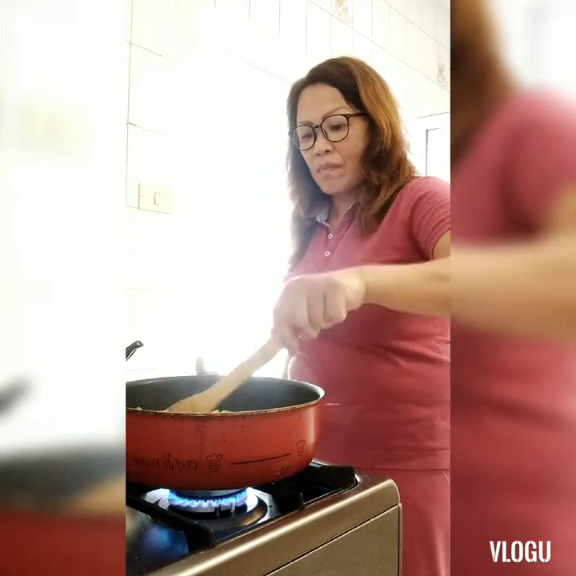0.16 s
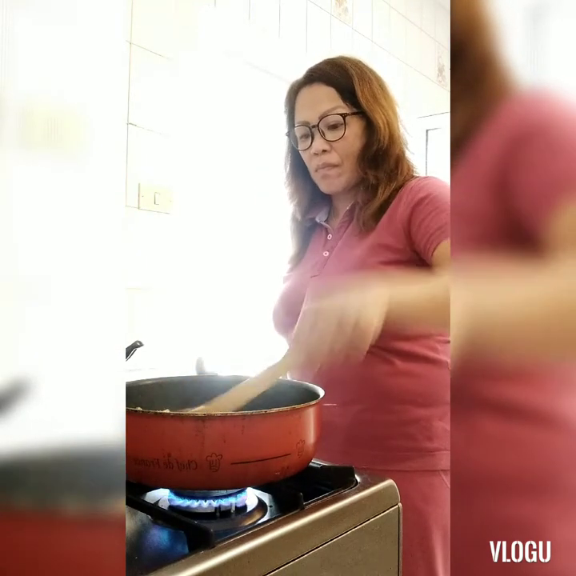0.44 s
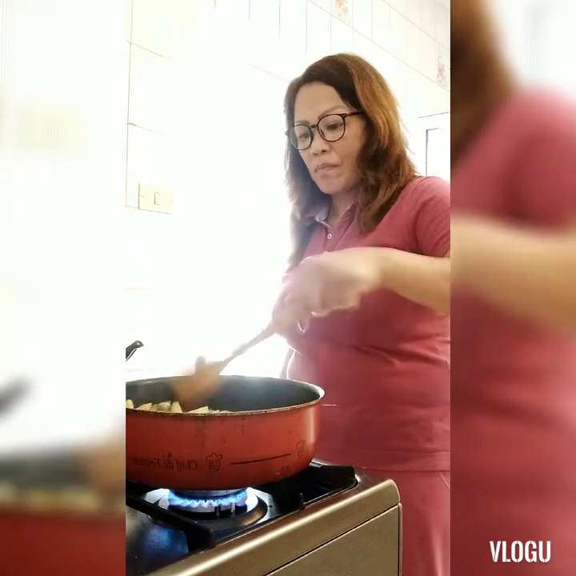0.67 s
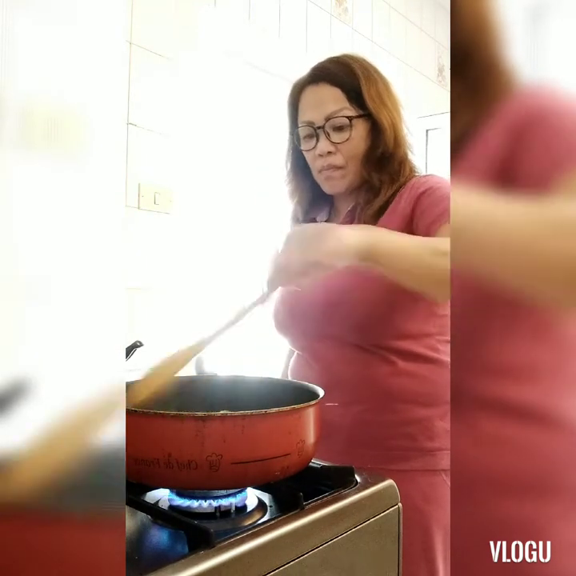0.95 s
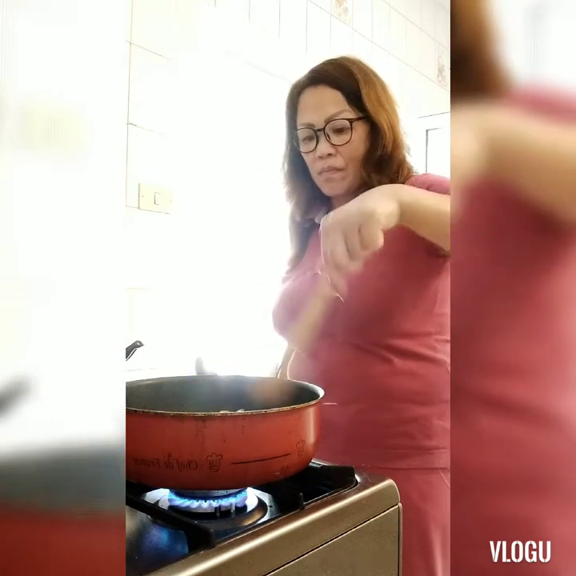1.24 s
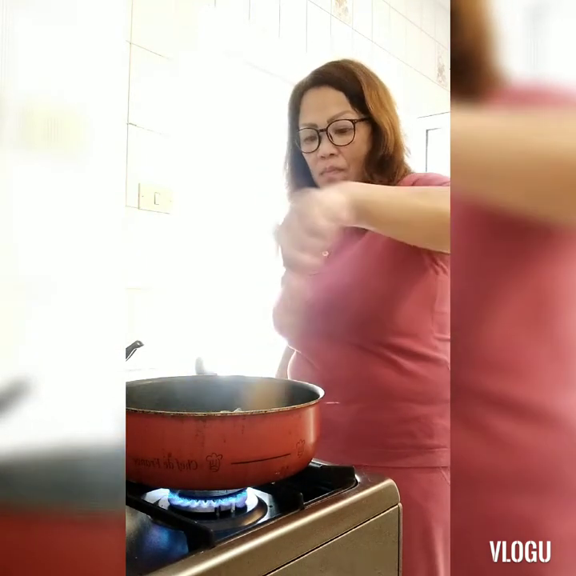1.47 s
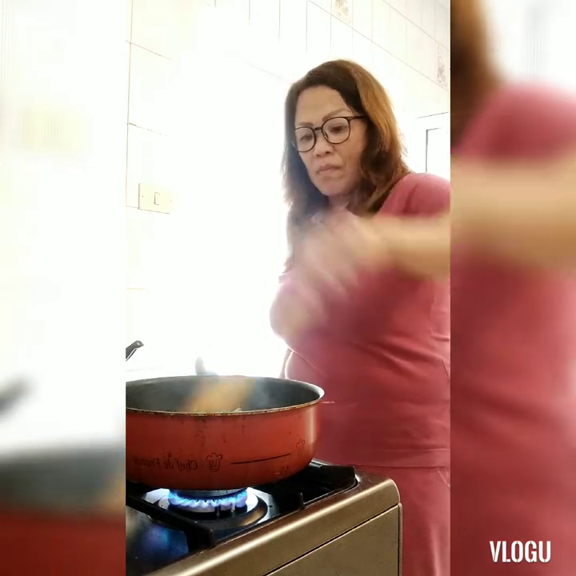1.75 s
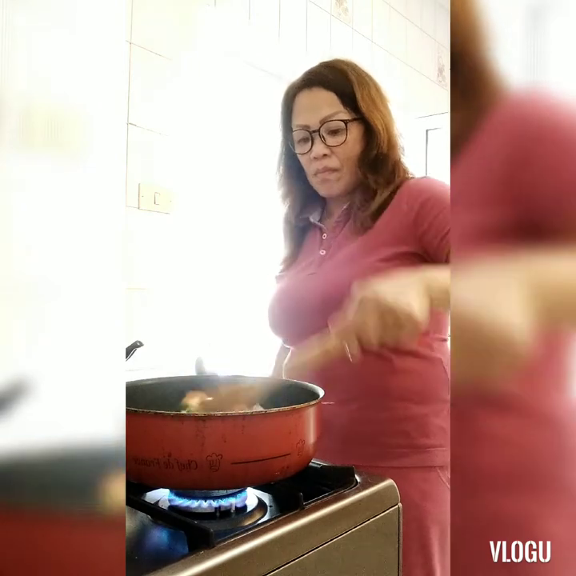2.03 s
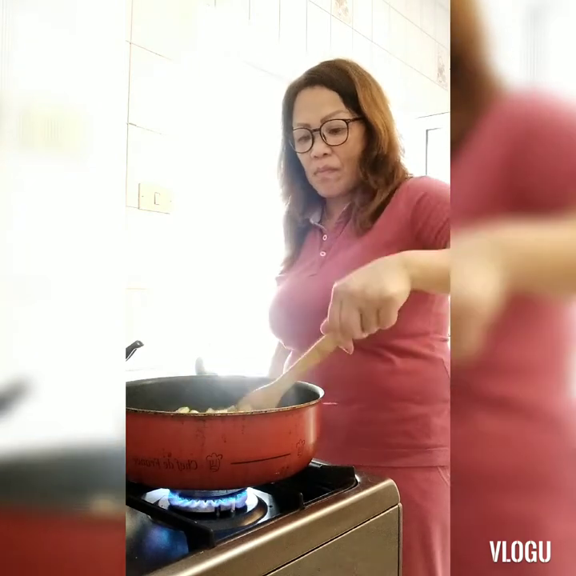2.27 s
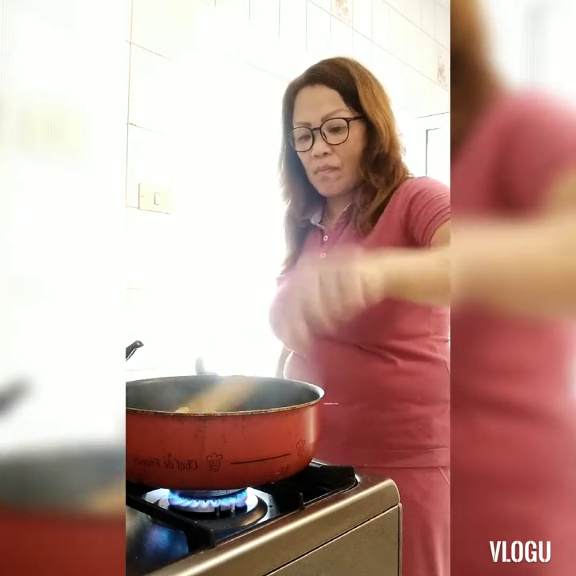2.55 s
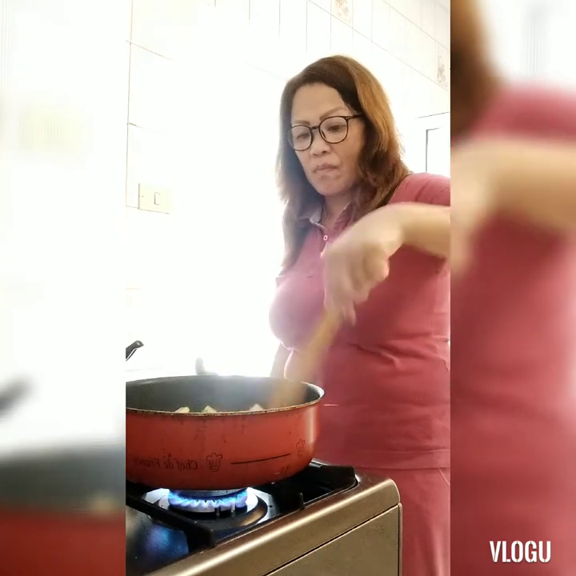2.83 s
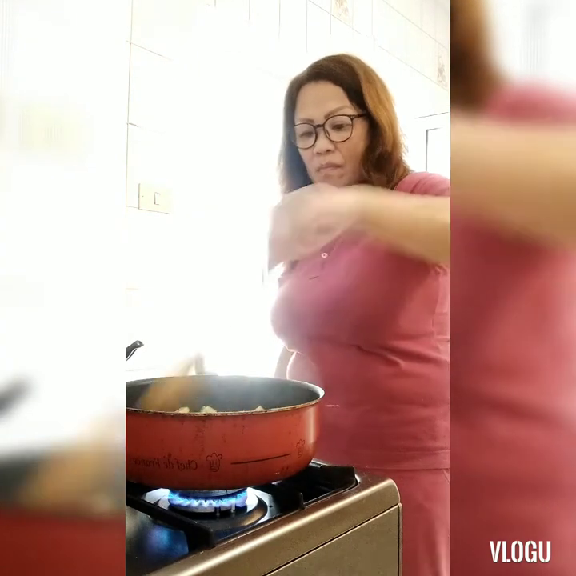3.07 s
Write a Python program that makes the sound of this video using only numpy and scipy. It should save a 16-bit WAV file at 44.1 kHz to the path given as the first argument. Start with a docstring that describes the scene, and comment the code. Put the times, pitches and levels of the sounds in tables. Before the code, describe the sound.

Wooden spatula knocking unevenly against a metal pan, with light scraping, frying hiss and low hum

```python
"""A soft scrape over frying hiss, then a wooden spatula knocks hard in a frying pan on a gas stove, close by.
Knocks: impulses and grainy chatter through the pan's modes, a low thud, a small kitchen's reverberation.
Scraping among the vegetables: grainy noise through the pan. Oil spits: bursts of treble noise.
Underneath: shaped noise for flame and frying, and a wavering low hum with rumble and two overtones."""
import sys
import numpy as np
from scipy import signal
from scipy.fft import rfft, irfft, next_fast_len
from scipy.io import wavfile
from scipy.ndimage import uniform_filter1d

SR = 44100
rng = np.random.default_rng(int(sys.argv[2]) if len(sys.argv) > 2 else 0)


def pcm_store(signal):
    """Save signal as 16-bit PCM."""
    levels = np.round(np.clip(np.atleast_2d(signal), -1, 1) * 32767)
    wavfile.write(sys.argv[1], SR, levels.astype(np.int16).T)


N = 141120

# pan modes: freq_hz, level_db, t60_s, home (-1 base, 1 wall)
PAN_MODES = [(365, 3.5, 0.58, -0.59), (463, 5, 0.18, -1.2), (572, -1.5, 0.049, -1), (646, 2, 0.075, -0.63),
             (739, 4, 0.051, 0.71), (820, 5.5, 0.023, -1.6), (1093.5, 2, 0.048, 0.85),
             (1301, 2, 0.031, 0.15), (1533, 0, 0.047, 0.64), (1876, 6, 0.029, -0.24), (2194, 6.5, 0.023, 1),
             (2464, 8, 0.027, 1), (2630, -6, 0.25, 0.23), (3270, -11, 0.063, 0.82), (4100, -3, 0.081, 0)]
# broad zones of pan and spatula above the base note (wall, rim, edge, tick): centre_hz, width_hz
PAN_ZONES = [(1100, 834), (1750, 1190), (2780, 1010), (3900, 3830)]
# knocks: start_s, crack_db, base_hz, blow_db, chatter_db, chatter_rise_s, chatter_lasts_s, thud_db,
# base_db, wall_db, rim_db, edge_db, tick_db
KNOCKS = [(0.1529, -10.5, 730, -7, -14.5, 0.0011, 0.087, -28, 3, 6, -3, -15.5, -52),
          (0.304, -14, 790, -33.5, -26, 0.0026, 0.038, -45.5, 16.5, 17, -13, -16, -52),
          (0.361, -16.5, 735, -21, -29, 0.0046, 0.031, -47.5, 7, 6, -27, -23, -42),
          (0.585, -17, 700, -11, -21.5, 0.00085, 0.069, -33, -10.5, -1, -6, -1, -9.5),
          (0.753, -32, 800, -39, -39.5, 0.0052, 0.087, -49, 12.5, 11.5, -25, -30, -44),
          (1.208, -47, 833, -34, -19, 0.033, 0.023, -44, 2, -12, -21, -33, -34),
          (1.238, -6.5, 646, -11, -14, 0.0024, 0.15, -44, 8, 0.5, -18, -42, -67),
          (1.249, -30, 520, -47, -28, 0.02, 0.044, -45.5, -17, 17, 6, 1.5, -48),
          (1.505, -25, 718, -7.5, -17.5, 0.0021, 0.068, -35, -6.5, 0, -8.5, -6.5, -10.5),
          (1.647, -46, 563, -32, -48, 0.0038, 0.071, -56, 4.5, 5.5, -27, -22, -12),
          (1.756, -54, 850, -34.5, -40.5, 0.0077, 0.088, -87, 5, -2.5, -36, -26, -16),
          (1.811, -45, 565, -34.5, -41.5, 0.0036, 0.05, -55, 5, -2.5, -29, -3, -25),
          (1.936, -17, 697, -7.5, -20, 0.0092, 0.047, -30.5, -2, 0, -2.5, -7.5, -19.5),
          (2.471, -39, 795, -53, -38, 0.0041, 0.044, -56, 11, -1, -3, -25, -43),
          (2.493, -26, 700, -15, -26.5, 0.001, 0.059, -42.5, 9, 6, 1, -36, -50),
          (2.8729, -3.5, 630, -11, -13.5, 0.002, 0.095, -29.5, 4.5, -1, 1, -7.5, -23),
          (2.895, -21, 542, -20, -10.5, 0.0025, 0.12, -33.5, 8.5, 5.5, -1, -29, -35)]
# clear ring of the wall after one blow: freq_hz, level_db, t60_s
WALL_RING_MODES = [(1093, -14, 0.15), (2724, -19, .05)]
# scraping level: time_s, level_db
SCRAPE_LEVEL = [(0, -44), (.13, -72), (.28, -42), (.46, -85), (.7, -42), (.85, -55), (1.15, -76),
                (1.42, -64), (1.49, -88), (1.66, -45), (1.84, -49), (1.9, -78), (2.1, -65), (2.2, -46.5),
                (2.3, -58), (2.45, -76), (2.67, -51.5), (2.84, -78), (3.08, -59), (3.2, -75)]
# pan zones under scraping (base, wall, rim, edge, tick): level_db
SCRAPE_ZONES_DB = [3, -4, -35, -13, -39]
# oil spits: start_s, rise_s, hold_s, fade_db_per_s, low_zone_db, mid_zone_db, high_zone_db
SPITS = [(0.582, 0.0029, 0.049, 281, -39.5, -43, -57), (0.829, 0.0028, 0.011, 500, -101, -57, -55),
         (1.501, 0.002, 0.054, 228, -40, -71, -75), (1.794, 0.068, 0.022, 200, -44.5, -68, -68),
         (1.925, 0.0059, 0.043, 294, -45.5, -81, -77), (2.232, 0.003, 0.006, 252, -53, -44.5, -65),
         (2.871, 0.0031, 0.034, 255, -55.5, -90, -84)]
# treble zones of a spit: centre_hz, width_hz
SPIT_ZONES = [(6900, 3360), (11200, 2000), (14000, 2000)]
# relative spectrum of flame and frying: freq_hz, density_db (per Hz)
HISS_SPECTRUM = [(60, -18), (100, 0), (200, -8.5), (400, -10), (900, -16.5), (2200, -15), (3400, -26.5),
                 (5000, -28), (7400, -22.5), (9000, -30.5), (11600, -19.5), (15800, -35)]
# swell of the hiss: time_s, gain_db
FRYING_SWELL = [(0, -2), (.9, 1), (1.2, 1), (1.7, 0), (1.9, 5.5), (2.3, 1.5), (3.2, -1.5)]
# hum and rumble level: time_s, level_db
HUM_LEVEL = [(0.0, -61), (0.22, -50), (0.3, -54.5), (1.1, -63), (1.34, -42), (1.41, -60.5), (2.03, -53),
             (2.09, -42), (2.17, -57), (2.29, -44.5), (2.36, -60), (2.44, -41), (2.7, -62), (3.2, -55)]
# hum overtones, 2nd and 3rd harmonic: level_db
HUM_OVERTONES_DB = [-64, -65]

BASE_WIDTH_HZ = 614  # the base note itself depends on how much food lies on the spot
MODES_DB, MODE_SCATTER_DB = 2.5, 2.
LEAN, LEAN_MAX_DB = 0.93, 5  # mode tilt per dB of wall over base, and its limit
BLOW_FOCUS = 0.6  # share of the zone widths: the blow rings them more narrowly than the chatter
PUSH_S = 0.00038
BOUNCE_DB, BOUNCE_PEAK_S, CONTACTS_PER_S = -0.5, 0.0036, 1000
REPEAT_DB, REPEAT_DELAY_S = -6, .009  # one quieter repeat of the crack, like a near wall's echo
FADE_DB_PER_S, LATE_FADE_DB_PER_S, CHATTER_GRAIN_DB = 246.5, 602, 3.5
THUD_HZ, THUD_WIDTH_HZ, THUD_PEAK_S = 309, 676, 0.023  # the stove top answers late and low
WALL_RING_START_S = 0.585
SCRAPE_BASE_HZ, SCRAPE_GRAIN_DB, SCRAPE_UNEVEN_DB = 700, 0.96, 2.5
SPIT_GRAIN_DB = 0.5
ROOM_T60_S, ROOM_DB, ROOM_DELAY_S = 0.34, -15.5, 0.0092
HISS_DB, HISS_GRAIN_DB, FLICKER_DB = -51, 1.46, -0.62
HUM_HZ, HUM_WAVER_DB, HUM_PHASE_RAD = 50.5, 5, 1.5
OVERTONE_WIDTH_HZ = 8.8
RUMBLE_DB, RUMBLE_HZ, RUMBLE_WIDTH_HZ = -11.5, 40.6, 75  # level relative to the hum
TOP_HZ = 15800


def knocks():
    """Spatula blows on the pan, one of them with a clear ring of the wall."""
    out = np.zeros(N)
    for start_s, *settings in KNOCKS:
        add(out, knock(*settings), start_s)
    add(out, wall_ring(), WALL_RING_START_S)
    return out


def knock(crack_db, base_hz, blow_db, chatter_db, rise_s, lasts_s, thud_db, *zones_db):
    """Dry crack, cluster of contacts ringing the pan, chatter, low thud; then a faster fall to silence."""
    t = np.arange(int(SR * .3)) / SR
    chance = rng.standard_normal(len(PAN_MODES))
    landing = t == 0
    repeat = t == t[int(REPEAT_DELAY_S * SR)]

    bounces = rng.standard_normal(len(t)) * late_peak(t, BOUNCE_PEAK_S)
    bounces = bounces * (rng.random(len(t)) < CONTACTS_PER_S / SR)
    contacts = landing + undb(BOUNCE_DB) * bounces

    dry_pan = pan_response(base_hz, zones_db, chance, rings=False)
    crack = through(pushed(landing + undb(REPEAT_DB) * repeat), dry_pan)
    focused_pan = pan_response(base_hz, zones_db, chance, BLOW_FOCUS)
    blow = through(pushed(contacts), focused_pan)

    late_fade_db = -LATE_FADE_DB_PER_S * np.maximum(t - lasts_s, 0)
    fade_db = late_fade_db - FADE_DB_PER_S * np.maximum(t - rise_s, 0)
    body = pan_response(base_hz, zones_db, chance)
    chatter = unit(through(grainy(len(t), CHATTER_GRAIN_DB), body))
    chatter = chatter * np.clip(t / max(rise_s, .001), 0, 1) ** 2 * undb(fade_db)

    thud = noise_band(len(t), THUD_HZ, THUD_WIDTH_HZ, 3) * late_peak(t, THUD_PEAK_S)

    hit = undb(crack_db) * crack / np.abs(crack).max()
    hit = hit + undb(blow_db) * blow / np.abs(blow).max()
    hit = hit + undb(thud_db) * thud
    return hit * undb(late_fade_db) + undb(chatter_db) * chatter


def pushed(impulses):
    """Each impulse widened to a short smooth push."""
    return np.convolve(impulses, np.hanning(int(PUSH_S * SR) + 2))[:len(impulses)]


def wall_ring():
    """Decaying sines: the pan wall singing freely."""
    t = np.arange(int(SR * .3)) / SR
    ring = sum(np.sin(2 * np.pi * hz * t) * undb(db - 60 * t / t60_s) for hz, db, t60_s in WALL_RING_MODES)
    return ring * np.clip(t / 0.0009, 0, 1)


def pan_response(base_hz, zones_db, chance, focus=1, rings=True):
    """Pan struck at one place: broad zones times modal ring, as a minimum-phase response."""
    lean_db = np.clip(LEAN * (zones_db[1] - zones_db[0]), -LEAN_MAX_DB, LEAN_MAX_DB)
    zones = [(base_hz, BASE_WIDTH_HZ)] + PAN_ZONES

    def response(f):
        broad = 0  # power
        for (hz, width_hz), db in zip(zones, zones_db):
            broad = broad + undb(2 * db) * abs(resonance(f, hz, width_hz * focus)) ** 8

        ring = 0  # power
        for (hz, db, t60_s, home), c in zip(PAN_MODES, chance):
            # near the wall: wall modes up, base modes down; on the laden base: wall modes down
            shift_db = min(home * lean_db, max(lean_db, 0))
            mode_db = db + shift_db + MODE_SCATTER_DB * c
            width_hz = np.log(1000) / np.pi / max(t60_s, .02)
            ring = ring + undb(2 * mode_db) * 60 * t60_s * abs(resonance(f, hz, width_hz)) ** 2

        power = broad * (1 + rings * undb(2 * MODES_DB) * ring)
        # folding the cepstrum makes the response causal
        cepstrum = irfft(np.log(power + 1e-12) / 2)
        cepstrum[1:len(f) - 1] *= 2
        cepstrum[len(f):] = 0
        return np.exp(rfft(cepstrum))
    return response


def scraping():
    """Dense uneven noise grains rubbed into the pan."""
    body = pan_response(SCRAPE_BASE_HZ, SCRAPE_ZONES_DB, np.zeros(len(PAN_MODES)))
    rub = grainy(N, SCRAPE_GRAIN_DB) * undb(SCRAPE_UNEVEN_DB * walk(24.8))
    return unit(through(rub, body)) * undb(curve(SCRAPE_LEVEL))


def spits():
    """Oil spits: noise bursts in three treble resonances."""
    out, t = np.zeros(N), np.arange(int(SR * .4)) / SR
    for start_s, rise_s, hold_s, fade_db_per_s, *zones_db in SPITS:
        attack = np.clip(t / max(rise_s, .001), 0, 1)
        shape = attack * undb(-fade_db_per_s * np.maximum(t - rise_s - hold_s, 0))
        noise = grainy(len(t), SPIT_GRAIN_DB)
        for (hz, width_hz), db in zip(SPIT_ZONES, zones_db):
            band = unit(through(noise, lambda f: resonance(f, hz, width_hz) ** 3))
            add(out, undb(db) * shape * band, start_s)
    return out


def room(near):
    """Kitchen reverberation: delayed, exponentially decaying noise as impulse response."""
    t = np.arange(SR // 2) / SR
    echo = rng.standard_normal(len(t)) * undb(-60 * t / ROOM_T60_S) * (t > ROOM_DELAY_S)
    echo = echo / np.sqrt(np.sum(echo ** 2))
    return undb(ROOM_DB) * signal.fftconvolve(near, echo)[:N]


def hiss():
    """Flame and frying: overlapping octave parts of noise that swell together and flicker alone."""
    hz, db = np.array(HISS_SPECTRUM).T
    spectrum = lambda f: undb(np.interp(np.log(f + 1), np.log(hz), db, left=-80))
    noise = unit(through(grainy(N, HISS_GRAIN_DB), spectrum))
    out = np.zeros(N)
    for k in range(10):
        octave = through(noise, lambda f: np.clip(1 - abs(np.log2(f / 60 + 1e-9) - k), 0, 1))
        out += octave * undb(FLICKER_DB * walk(10.51))
    return undb(HISS_DB + curve(FRYING_SWELL)) * out


def hum():
    """Sine wandering in phase and level, in low rumble; overtones are steady narrow noise bands."""
    overtones = np.zeros(N)
    for k, db in enumerate(HUM_OVERTONES_DB):
        overtones += undb(db) * noise_band(N, HUM_HZ * (k + 2), OVERTONE_WIDTH_HZ, 2)
    phase = 2 * np.pi * HUM_HZ * np.arange(N) / SR + HUM_PHASE_RAD * walk(3.1)
    tone = np.sqrt(2) * np.sin(phase) * undb(HUM_WAVER_DB * walk(14))
    rumble = undb(RUMBLE_DB) * noise_band(N, RUMBLE_HZ, RUMBLE_WIDTH_HZ, 2)
    return (tone + rumble) * undb(curve(HUM_LEVEL)) + overtones


def undb(db):
    """Decibels to amplitude."""
    return 10 ** (np.asarray(db) / 20)


def unit(x):
    """Scale to RMS 1."""
    return x / np.sqrt(np.mean(x ** 2))


def curve(table):
    """(time_s, value) table, interpolated to one value a sample."""
    return np.interp(np.arange(N) / SR, *np.array(table).T)


def late_peak(t, peak_s):
    """Envelope rising from 0 to 1 at peak_s, then decaying."""
    return t / peak_s * np.exp(1 - t / peak_s)


def resonance(f, hz, width_hz):
    """Two-pole resonance, gain 1 at its centre."""
    return 1 / (1 + 1j * (f - hz ** 2 / (f + 1e-9)) / width_hz)


def through(x, response):
    """Filter x by a response given as a function of frequency."""
    size = 2 * next_fast_len(len(x))
    f = np.arange(size // 2 + 1) * SR / size
    return irfft(rfft(x, size) * response(f), size)[:len(x)]


def noise_band(count, hz, width_hz, order):
    """White noise through a repeated resonance, RMS 1."""
    return unit(through(rng.standard_normal(count), lambda f: resonance(f, hz, width_hz) ** order))


def grainy(count, grain_db):
    """Noise whose level jumps about every millisecond."""
    steps = np.repeat(rng.standard_normal(count // 44 + 1), 44)[:count]
    return unit(rng.standard_normal(count) * undb(grain_db * steps))


def walk(rate_hz):
    """Slow random wander, RMS 1: held random values, smoothed twice."""
    k = int(SR / rate_hz)
    held = np.repeat(rng.standard_normal(N // k + 1), k)
    return unit(uniform_filter1d(uniform_filter1d(held, k), k)[:N])


def add(out, x, at_s):
    """Mix x into out at at_s, cut at the end."""
    i = int(at_s * SR)
    out[i:i + len(x)] += x[:len(out) - i]


def scene():
    """Pan sounds with their reverberation, over hiss and hum."""
    near = knocks() + scraping() + spits()
    return (near + room(near) + hiss() + hum())[None]


def record(dry):
    """The phone cuts the top: steep elliptic low-pass."""
    return signal.sosfilt(signal.ellip(10, .2, 80, TOP_HZ, fs=SR, output="sos"), dry)


dry = scene()
out = record(dry)
pcm_store(out)
```